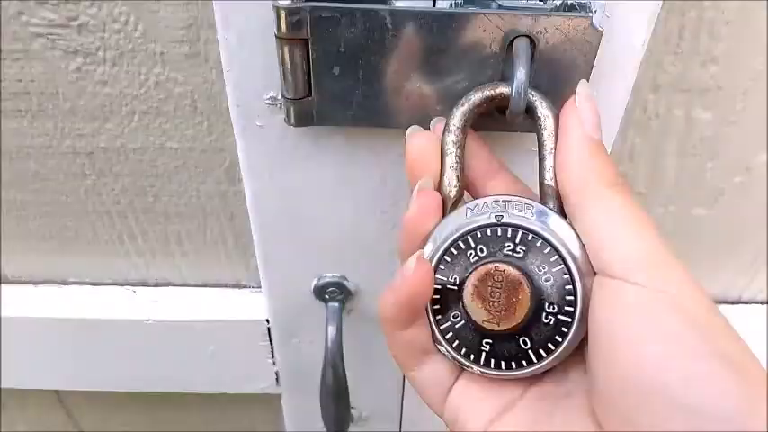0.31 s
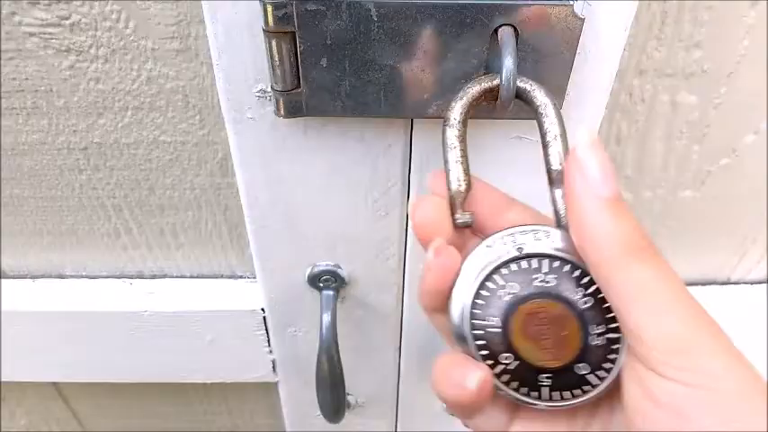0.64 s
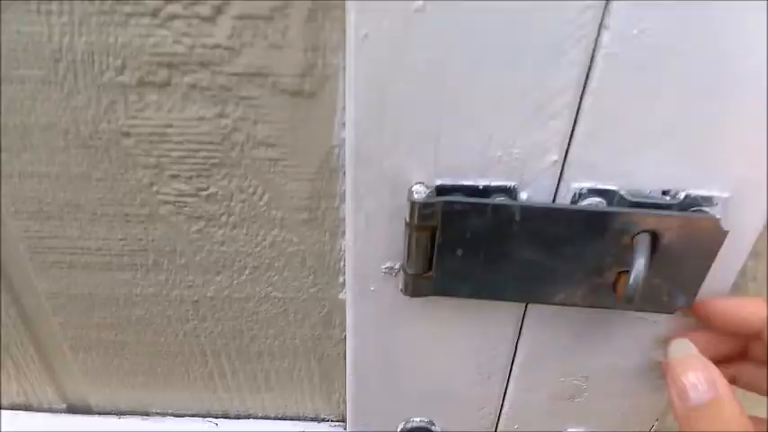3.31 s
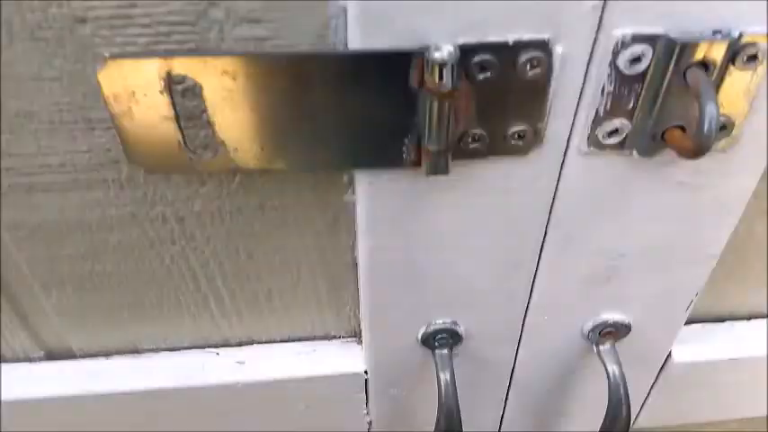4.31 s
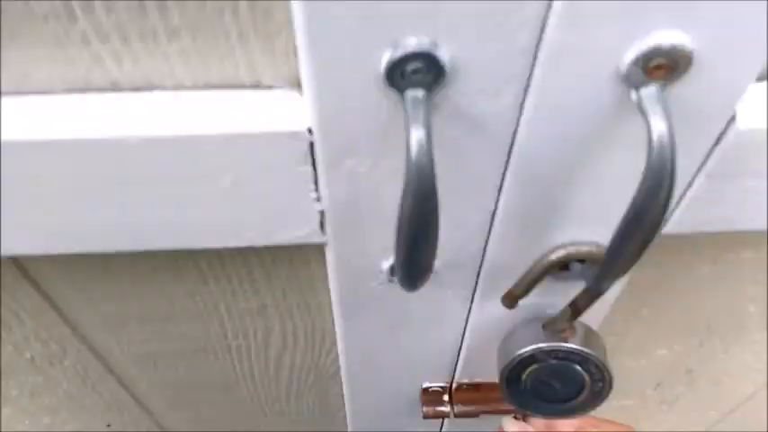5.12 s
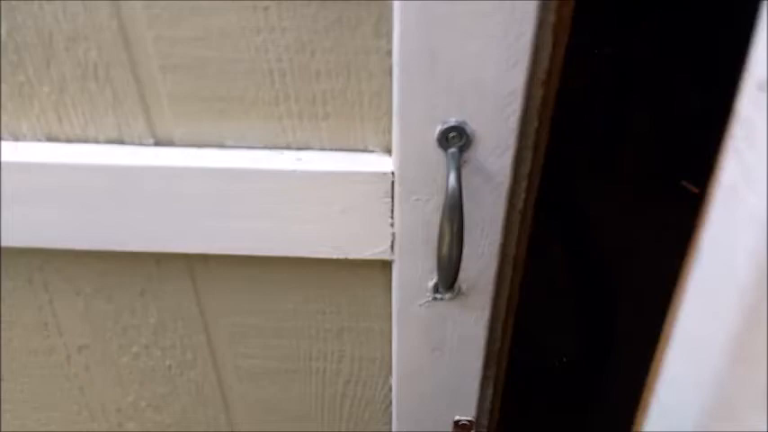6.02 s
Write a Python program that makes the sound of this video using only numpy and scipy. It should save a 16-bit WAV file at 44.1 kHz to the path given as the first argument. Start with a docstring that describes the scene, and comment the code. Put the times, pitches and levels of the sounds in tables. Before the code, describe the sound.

Close steel clicks, scrapes and short squeaks as a padlock is unhooked and its hasp opened, with a wooden door knocking and thudding.

```python
"""A combination padlock is twisted and drawn out of a steel hasp on a wooden shed door, heard close up.
Steel clicks and scrapes on steel, the boards knock along, and the lock rings thinly as it swings free.
The hasp is pulled open with a few stick-slip squeaks, and the door thuds as it is tugged.
A short gust buffets the microphone first; soft outdoor air and handling rumble lie under the rest."""
import sys
import numpy as np
from scipy import signal
from scipy.fft import rfft, irfft, next_fast_len
from scipy.io import wavfile
from scipy.ndimage import uniform_filter1d, map_coordinates

SR = 44100
rng = np.random.default_rng(int(sys.argv[2]) if len(sys.argv) > 2 else 0)


def store_pcm(level_fs):
    """Save levels as 16-bit WAV."""
    pcm = np.round(np.clip(level_fs, -1, 1) * 32767).astype(np.int16)
    wavfile.write(sys.argv[1], SR, np.atleast_2d(pcm).T)


N = 272538

# Steel striking steel. Each row: start in seconds, level in dB, brightness in dB, then door knock and
# shackle clank in dB over the level.
CLICKS = [(0.572, -54, -3, -2, 3), (0.6832, -31.5, 1.5, -7.5, 0), (0.7277, -31.5, -0.5, -6, -4.5),
          (0.7298, -37, 8.5, -7, -0.5), (1.126, -56.5, -3.5, 3, 5), (1.3423, -44.5, -1, -8, 5),
          (1.4014, -41.5, 2.5, -6, 3), (1.642, -51, 2, -3, 9), (1.7236, -33, 0.5, -5, 0),
          (1.729, -40, 3.5, -3, -1), (1.7557, -49.5, -6, -13, 3), (1.776, -50.5, -4.5, -7, -2),
          (1.804, -44, -3, 6, 3), (1.8107, -39.5, 0, -3.5, 3), (1.814, -37.5, -0.5, -6, 4.5),
          (1.887, -35, 1.5, -0.5, -5), (1.9018, -36.5, -3.5, -12, -3.5), (1.9234, -32, 3, -13, -3),
          (1.927, -39, 7.5, -22, 3), (1.936, -40, 6, -13, 5), (1.945, -35.5, 9, -10, -1),
          (1.968, -45, -3, -9, -1), (1.991, -43, 2, -10, -0.5), (2.026, -45, 4, -13, 1.5),
          (2.042, -39.5, 7, -12, 0), (2.06, -43, 7, -16, -1), (2.071, -35.5, 9.5, -35, 1.5),
          (2.078, -42.5, 2, -24, -5), (2.1034, -33.5, 7, -13.5, -5.5), (2.151, -44, 0, -3.5, -2),
          (2.157, -48, 2, -12, -6), (2.16, -41, 11, -6.5, -2), (2.1906, -59, -2, -14, -6),
          (2.218, -52, 9, -5, 1), (2.635, -57.5, -6, -3, 3), (2.793, -49.5, 4.5, -7, 6.5),
          (2.86, -59, -8.5, -10, 2), (2.9629, -54, 2, 5.5, 7), (3.0486, -30.5, 6.5, -4.5, -3),
          (3.123, -65, -6, 7, -3), (3.241, -61.5, -5, 3, -9), (3.26, -54, 0, 3, -6),
          (3.568, -36.5, 5, -12, -2.5), (3.667, -54.5, -6, 7, -2), (3.704, -55, -5.5, -1, -1),
          (3.719, -47.5, -2, -15, 6), (3.744, -50.5, -1.5, 0, -3), (3.753, -51.5, -2.5, -0.5, 0),
          (3.803, -44, -2, -11, 5), (3.823, -50.5, -4, -10, 5), (3.8547, -34.5, -2.5, -10, 0),
          (3.8585, -29.5, 2.5, -6.5, 6), (3.868, -37, 0.5, -7, 4), (3.8737, -41.5, 2, -8, 4.5),
          (4.1742, -50.5, -4, -8, -2.5), (4.1962, -48.5, -4, -6, 1.5), (4.2175, -51, 0, -6, -1),
          (4.555, -59.5, 5.5, -15, 5), (4.866, -59, -7.5, 10, -8), (4.967, -36.5, 3.5, 2.5, 0.5),
          (4.972, -40.5, 6.5, -12, 0), (4.987, -41.5, -0.5, 1, 1), (4.999, -40.5, 6, -5, -5),
          (5.013, -44, 0, -2, -1.5), (5.0595, -55.5, -2, -4, 4), (5.169, -42.5, -5.5, -3, 4),
          (5.2253, -31, 5, -11.5, 1.5), (5.3768, -57, 1.5, -9, 9), (5.3849, -44, 7.5, -13, 3.5),
          (5.399, -53, 3, -9, 2), (5.4563, -46.5, 8, -5.5, 5.5), (5.484, -60.5, 11, -14, 0),
          (5.5, -54, 3, 5, 3), (5.677, -49, -8, 2, 3), (5.9636, -32, 5.5, -7.5, 0),
          (6.121, -57, 0.5, -5, 7.5), (6.158, -46.5, 1.5, -17.5, 0.5)]
# What a blow sets ringing: door, hasp plate, shackle, tick. Each row: low and high edge in Hz, t60 in
# seconds, then snap, after-ring and the after-ring's stereo spread in dB.
PARTS = [(258, 760, 0.099, 1.5, 3.5, 6), (780, 2420, 0.069, 1, -2.5, -2.5),
         (2520, 6420, 0.038, 0, -2.5, 14), (6500, 14000, 0.035, 1, 2, 1)]
# Modes of lock, hasp and door together. Each row: pitch in Hz, level in dB, t60 in seconds.
BODY_MODES = [(505, 3.5, 0.052), (578, -3.5, 0.082), (725, -6.5, 0.026), (920, -5, 0.038),
              (1160, 1.5, 0.04), (1444, 1.5, 0.049), (1656, -2.5, 0.026), (2220, -6, 0.022),
              (2400, -2, 0.015), (2630, 0, 0.017), (2858, 11, 0.022), (3430, 9, 0.0029),
              (4284, 16.5, 0.013), (4680, 2.5, 0.014), (5800, -8.5, 0.02), (8060, -2, 0.0012),
              (9680, -5.5, 0.015), (10500, -9, 0.04), (13600, -18.5, .035)]
# Hard blows on the hasp. Each row: start in seconds, pitch in Hz, level in dB, t60 in seconds.
CLANGS = [(0.6828, 1210, -31, 0.029), (.7278, 586, -24.5, 0.026), (.7278, 2680, -25, .011),
          (.7278, 1150, -22.5, 0.01), (3.0473, 8700, -13, 0.0042), (3.0485, 490, -39, .04),
          (3.8586, 1890, -20.5, 0.013), (5.168, 1570, -27.5, 0.022), (5.2257, 1460, -22, 0.02),
          (5.2255, 5940, -15.5, 0.0065), (5.9637, 1630, -35, .025)]
# The lock bumping the door. Each row: start in seconds, boards in dB, hasp plate in dB.
KNOCKS = [(0.7278, -41, -33.5), (1.343, -59, -45), (1.4016, -50, -40.5), (1.643, -49, -52),
          (1.8134, -36, -39), (2.6355, -44, -41), (2.793, -43.5, -70), (2.8594, -42.5, -43),
          (3.874, -46.5, -50), (4.081, -50.5, -59), (4.97, -34, -33), (5.229, -46.5, -39),
          (5.397, -56, -47.5), (5.853, -41.5, -54), (6.055, -54, -49.5)]
# Gritty stretches. Those at 0.662 and 5.212 s are brief swells of gritty noise just before a hard click;
# the rest are steel scrapes. Each row: start and end in seconds, level in dB, brightness in dB, then door
# knock and shackle clank in dB over the level.
GRIT = [(0.662, 0.684, -51, -5, -8, -2), (0.69, 0.752, -52, 4, -12, -1), (1.72, 1.82, -60, -1.5, 14.5, -2),
        (1.885, 2.035, -52.5, -5, -1, -1), (2.056, 2.088, -48, 3, -12, 3), (2.14, 2.245, -54.5, 3, -4.5, 1),
        (3.19, 3.36, -82.5, -2, 23.5, -14), (3.563, 3.58, -46.5, 2.5, -18, -3.5),
        (3.715, 3.76, -57, -3, 2, 6), (3.8, 3.868, -44.5, 0.5, -6, 3.5),
        (4.964, 5.022, -39.5, -1, -5, -2.5), (5.02, 5.055, -55, 0, -1, -4), (5.125, 5.19, -52.5, 5.5, 2, 0),
        (5.212, 5.226, -45, -3, -3, -5), (5.264, 5.302, -59.5, 9, -22, 1.5), (5.38, 5.407, -52.5, 0, -8, 3),
        (5.45, 5.52, -61.5, -1.5, 1, -0.5), (5.598, 5.635, -54.5, -4.5, 5, -1.5),
        (5.666, 5.73, -52, -1, 4.5, 1.5), (6.07, 6.11, -61, -7, -3, 4)]
# The shackle grinding through the staple. Each row: start and end in seconds, first and last level in dB.
GRINDS = [(3.654, 3.695, -49, -52), (3.7, 3.774, -44.5, -47.5), (3.789, 3.851, -39.5, -39.5)]
# The resonances of that grind. Each row: pitch in Hz, width in Hz, level in dB.
GRIND_MODES = [(598, 41, -2), (1150, 45, -5.5), (1473, 70, 3), (2084, 35, -1.5), (2750, 100, 2)]
# The lock left ringing freely. Each row: start in seconds, level in dB.
CHIMES = [(.728, -61), (1.724, -58), (2.225, -58), (4.995, -54)]
# The lock's lightly damped high modes. Each row: pitch in Hz, level in dB, t60 in seconds.
CHIME_MODES = [(8952, 0, .48), (10680, 4, .12), (13200, 0, .07)]
# Dry squeaks. Each row: start and length in seconds, first and last pitch in Hz, level in dB,
# roughness from 0 to 1.
SQUEAKS = [(3.699, 0.041, 1397, 1304, -42, 0.77), (3.757, 0.028, 13400, 13200, -49, 0.4),
           (3.794, 0.022, 1500, 1580, -37, 0.5), (4.541, 0.054, 1560, 1478, -38.5, 0.35),
           (5.135, 0.014, 10160, 10500, -19, 0.3), (5.142, 0.021, 10460, 10200, -40, 0.2),
           (5.258, 0.049, 11100, 10950, -32, 0.62)]
# The door hitting its frame. Each row: start in seconds, level in dB, t60 in seconds, push pitch in Hz.
THUDS = [(4.964, -31, 0.12, 73.3), (4.979, -23.5, 0.065, 160), (5.012, -36.5, 0.13, 215)]
# The door's low hum. Each row: pitch in Hz, level in dB.
PANEL_MODES = [(113, -22), (145, -22), (226, -15.5), (318, -14)]

# The envelope of the buffeting. Each row: time in seconds, level in dB.
GUST_ENVELOPE = [(0, -21), (.025, -39), (.095, -39), (.125, -28), (.155, -32.5), (.185, -29.5),
                 (.212, -21.5), (.25, -34), (.287, -25), (.31, -34)]
# Tone curves of the gust and the background bed. Each row: frequency in Hz, relative density in dB.
BUFFET_EQ = [(20, -8), (40, -10), (70, 1), (120, -3), (170, -4), (260, -12), (420, -27.5), (900, -67)]
WASH_EQ = [(100, -3), (300, -2.5), (550, -6), (850, -0.5), (1200, -5.5), (1750, -2.5), (2500, -12),
           (4000, -23.5), (7000, -29.5), (15000, -36)]
RUMBLE_EQ = [(20, -22), (40, -10.5), (60, -11.5), (85, 3.5), (110, -7.5), (160, -20.5), (400, -68)]
LOW_AIR_EQ = [(60, -34.5), (110, -16.5), (145, 0), (178, 0), (212, -6), (262, 0.5), (330, -5), (410, -9.5),
              (520, -8.5), (750, -28.5), (1500, -75.5)]
MID_AIR_EQ = [(250, -64), (500, 0), (750, -1.5), (900, 0.5), (1150, -2), (1550, 2.5), (1900, -4),
              (2500, -8.5), (3400, -12), (5000, -23), (9000, -88.5)]
HISS_EQ = [(2000, -65), (3600, 1), (4500, 6), (5300, 5.5), (6400, 1), (6680, -5.5), (6950, 0.5), (9200, -1),
           (11400, -1.5), (16000, -7)]
# How alike the bed is left and right. Each row: frequency in Hz, coherence from 0 to 1.
BED_COHERENCE = [(60, 0.93), (250, 0.71), (700, 0.52), (900, 0.13), (1150, 0.5), (1500, 1), (2200, 0.62),
                 (2750, 0.14), (3600, 1), (4600, 0.095), (15000, 0.87)]
# The bed rising out of the hush. Each row: time in seconds, gain in dB.
BED_FADE_IN = [(.42, -19.5), (.5, -4.5), (.6, 1)]
# The bed ducks after the hardest clicks. Each row: start in seconds, low point in dB, recovery in dB
# per second.
BED_DIPS = [(.745, -66, 16), (1.949, -61, 9.5), (2.111, -73, 16), (3.055, -70, 18.5), (3.875, -68.5, 11),
            (5.03, -59, 11), (5.228, -70.5, 18), (5.968, -65.5, 14)]
# Phase between the two microphone ports. Each row: frequency in Hz, left minus right in radians.
PORT_PHASE = [(60, 1.84), (200, 0.98), (450, 0.87), (1000, 0.5), (2000, -0.5), (2400, -0.18), (2800, 2.5),
              (3600, 2), (4200, 3.5), (4900, -0.26), (6200, -0.04), (7250, -3), (8300, -1.5), (9000, -0.7),
              (10200, 1.11), (11400, 3), (12600, 5.5), (13600, 8), (15500, 6.5)]
# Each port favours its own frequencies. Each row: frequency in Hz, left minus right in dB.
PORT_BALANCE = [(1500, -0.5), (2600, -0.5), (3500, -0.5), (4400, 5.5), (5300, -1.5), (6300, 1.5),
                (8000, -0.5), (10500, -1), (13500, 2)]

TOP_HZ = 16300


def clicks(blow=3.5, chatter_s=0.00064, halving_db=3.5):
    """Steel hits steel: a sharp blow, then the faces chatter; duller clicks are longer and grittier."""
    rows, t, out = np.array(CLICKS), np.arange(SR // 40) / SR, np.zeros((2, N))
    bright_db = rows[:, 2:3]
    decay_s = chatter_s * .5 ** (bright_db / halving_db)
    chatter = rng.standard_normal((len(rows), len(t))) * np.exp(-t / decay_s)
    chatter[:, 0] = blow
    for part, response in enumerate(part_responses(len(rows), ring_db=3.5)):
        hits = unit_energy(signal.fftconvolve(chatter[:, None], response, axes=-1)) * np.sqrt(SR // 100)
        for (s, *stroke), hit in zip(rows, hits):
            add(out, s, amp(part_levels(*stroke)[part]) * hit)
    return out


def part_responses(count, ring_db):
    """Each part answers count blows in stereo: a direct snap, ringing modes and a diffuse after-ring."""
    t = np.arange(SR // 9) / SR
    hz, db, t60 = np.transpose(BODY_MODES)
    modes = unit_energy(np.sin(2 * np.pi * hz[:, None] * t) * amp(-60 * t / t60[:, None]))
    # every blow lands elsewhere and so wakes the modes in new proportions
    weights = amp(db + 3.5 * rng.standard_normal((count, len(hz))))
    ringing = (weights * rng.choice([-1, 1], weights.shape)) @ modes
    impulse = 1. * (t == 0)
    for low_hz, high_hz, after_t60, snap_db, after_db, spread_db in PARTS:
        centre = rng.standard_normal((count, 1, len(t)))
        sides = amp(spread_db) * rng.standard_normal((count, 2, len(t)))
        tail = (centre + sides) * amp(-60 * t / after_t60) * (1 - np.exp(-t / 0.00018))
        snap, ring, after = (unit_energy(band(x, low_hz, high_hz))
                             for x in (impulse, ringing[:, None], tail))
        yield amp(snap_db) * snap + amp(ring_db) * ring + amp(after_db) * after


def part_levels(level_db, bright_db, door_db, clank_db, tick_db=-7):
    """The mix of door, plate, shackle and tick in dB: brightness tilts it from the plate to the tick."""
    return level_db + np.array([door_db, -bright_db, clank_db, tick_db + bright_db])


def clangs(attack_s=.0002):
    """A hard blow makes one mode of the hasp stand out, its pitch set by where the blow lands."""
    out, t = np.zeros(N), seconds(.08)
    attack = 1 - np.exp(-t / attack_s)
    for s, hz, db, t60 in CLANGS:
        add(out, s, amp(db - 60 * t / t60) * np.sin(2 * np.pi * hz * t) * attack)
    return out


def knocks(boards_t60=0.098, plate_t60=.04, spread_db=-7, push=6.9):
    """A cushioned bump with no click: a hollow knock from the boards, a short dull one from the plate."""
    out, t = np.zeros((2, N)), seconds(0.13)
    boards_hz, plate_hz = (267, 676), (645, 1960)
    for s, boards_db, plate_db in KNOCKS:
        for db, t60, edges in ((boards_db, boards_t60, boards_hz), (plate_db, plate_t60, plate_hz)):
            noise = rng.standard_normal(len(t)) + amp(spread_db) * rng.standard_normal((2, len(t)))
            bump = noise * amp(-60 * t / t60) + push * (t == 0)
            add(out, s, amp(db) * np.sqrt(SR // 100) * unit_energy(band(bump, *edges)))
    return out


def grit(grains_per_s=500, noise_db=-13):
    """Tiny grains ring the same parts as a click: scrapes, and brief gritty swells before hard clicks."""
    out = np.zeros((2, N))
    responses = list(part_responses(len(GRIT), ring_db=-2.0))
    for k, (start, end, *stroke) in enumerate(GRIT):
        size = max(int((end - start) * SR), SR // 100)
        grains = unit((rng.random(size) < grains_per_s / SR) * rng.standard_normal(size))
        noise = amp(noise_db) * rng.standard_normal(size)
        drive = (grains + noise) * amp(2.6 * wobble(122, size)) * signal.windows.tukey(size, .3)
        for db, response in zip(part_levels(*stroke), responses):
            texture = unit_energy(signal.fftconvolve(drive[None], response[k], axes=-1))
            add(out, start, amp(db) * np.sqrt(size) * texture)
    return out


def grinds(slips_per_s=450, drift=0.023):
    """Uneven slips of the shackle ring a few resonances, which wander as the point of contact moves."""
    out, t = np.zeros(N), seconds(0.046)
    modes = [(db, np.cos(2 * np.pi * hz * t) * np.exp(-np.pi * width * t))
             for hz, width, db in GRIND_MODES]
    for start, end, first_db, last_db in GRINDS:
        size = int((end - start) * SR)
        slips = (rng.random(size) < slips_per_s / SR) * rng.uniform(-0.95, 1, size)
        rasp = sum(amp(db) * unit(signal.fftconvolve(slips, mode)[:size]) for db, mode in modes)
        speed = 1 + drift * wobble(35, size)
        wandering = np.interp(np.cumsum(speed), np.arange(size), rasp)
        envelope = amp(np.linspace(first_db, last_db, size)) * signal.windows.tukey(size, .25)
        add(out, start, unit(wandering) * envelope)
    return out


def chimes():
    """The high modes of the lock sing on after it is let go."""
    out, t = np.zeros(N), seconds(.5)
    ring = sum(amp(db - 60 * t / t60) * np.sin(2 * np.pi * hz * t) for hz, db, t60 in CHIME_MODES)
    for s, db in CHIMES:
        add(out, s, amp(db) * ring)
    return out


def squeaks(third_db=-18):
    """Stick-slip grabs one mode: the pitch slides and trembles, and low squeaks carry a third harmonic."""
    out = np.zeros(N)
    for s, length, start_hz, end_hz, db, rough in SQUEAKS:
        size = int(length * SR)
        hz = np.linspace(start_hz, end_hz, size) * (1 + .025 * rough * wobble(770, size))
        swell = np.hanning(size) * amp(db + 4.8 * rough * wobble(230, size))
        phase = 2 * np.pi * np.cumsum(hz) / SR
        third = np.sin(3 * phase) * (3 * start_hz < TOP_HZ)
        add(out, s, swell * (np.sin(phase) + amp(third_db) * third))
    return out


def thuds(panel_t60=0.35, wood_db=-2, attack_s=0.0053):
    """The door lurches in its frame with a low push and a woody boom, then its panel modes hum on."""
    out, t = np.zeros((2, N)), seconds(0.49)
    for s, db, t60, push_hz in THUDS:
        wood = unit(band(rng.standard_normal((2, len(t))), 60, 380, order=2))
        boom = (np.sin(2 * np.pi * push_hz * t) + amp(wood_db) * wood) * amp(-60 * t / t60)
        panel = sum(amp(mode_db - 60 * t / panel_t60) * np.sin(2 * np.pi * (hz * t + rng.random()))
                    for hz, mode_db in PANEL_MODES)
        add(out, s, amp(db) * (boom + panel) * (1 - np.exp(-t / attack_s)))
    return out


def gust(lag_s=0.0004, lumps_db=5.0, wash_db=-44.5):
    """Wind pushes the two microphone ports in opposite senses, over an outdoor wash from the right."""
    def from_right(hz):
        # the path difference shows only above the midrange
        return np.exp(1j * np.pi * lag_s * np.outer([-1, 1], np.maximum(hz - 1150, 0)))
    push = rng.standard_normal(N) * [[-.92], [1.08]] + 0.16 * rng.standard_normal((2, N))
    wind = filtered(push, lambda hz: amp(along(BUFFET_EQ, hz)))
    buffet = unit(wind * amp(lumps_db * wobble(42, N)))
    outdoors = rng.standard_normal(N) + 0.44 * rng.standard_normal((2, N))
    wash = unit(filtered(outdoors, lambda hz: amp(along(WASH_EQ, hz)) * from_right(hz)))
    return amp(automation(GUST_ENVELOPE)) * buffet + amp(wash_db) * wash


def bed(hiss_db=-11.5, hiss_floor_db=-89):
    """Handling rumble, outdoor air, a whine and hiss ride one fader; a trace of hiss never ducks."""
    fader = amp(bed_fader_db())
    body = (whine()
            + amp(-9.5) * air(RUMBLE_EQ, flutter_db=1.5)
            + amp(2.5) * air(LOW_AIR_EQ, flutter_db=2.0)
            + amp(-0.5) * air(MID_AIR_EQ, flutter_db=0.74))
    hiss = air(HISS_EQ, flutter_db=2.5)
    return fader * body + (fader * amp(hiss_db) + amp(hiss_floor_db)) * hiss


def bed_fader_db(resting_db=-49.0):
    """The bed drops at each dip and creeps back at a steady rate; the fade-in gain goes on top."""
    t, db = np.arange(N) / SR, np.full(N, resting_db)
    for s, low_db, recover_db_per_s in BED_DIPS:
        db = np.where(t < s, db, np.minimum(low_db + recover_db_per_s * (t - s), resting_db))
    return uniform_filter1d(db, SR // 50) + automation(BED_FADE_IN)


def air(eq, flutter_db):
    """Coloured mid and side noise with a fluttering level; its stereo width varies with frequency."""
    def colour(hz):
        width = np.arccos(np.clip(along(BED_COHERENCE, hz), 0, 1)) / 2
        return amp(along(eq, hz)) * [np.cos(width), np.sin(width)]
    mid, side = filtered(rng.standard_normal((2, N)), colour)
    return np.array([mid + side, mid - side]) / np.std(mid) * amp(flutter_db * wobble(14, N))


def whine(centre_hz=6650, width_hz=220, mix_db=-17.5, fade_db_per_s=1.5):
    """A faint, narrow band of noise that slowly dies away."""
    tone = filtered(rng.standard_normal(N), lambda hz: 1 / (1 + (2 * (hz - centre_hz) / width_hz) ** 2))
    return amp(mix_db - fade_db_per_s * np.arange(N) / SR) * unit(tone)


def at_ports(x):
    """Sound reaches the two microphone ports out of step and unequally loud, varying with frequency."""
    def response(hz):
        phase = np.outer([.5, -.5], along(PORT_PHASE, hz))
        balance_db = np.outer([.5, -.5], along(PORT_BALANCE, hz))
        return np.exp(1j * phase) * amp(balance_db)
    return filtered(x, response)


def amp(db):
    """Decibels to gain."""
    return 10 ** (np.asarray(db) / 20)


def unit(x):
    """x at rms 1."""
    return x / np.sqrt(np.mean(x ** 2) + 1e-20)


def unit_energy(x):
    """x with energy 1 in each channel."""
    return x / np.sqrt(np.sum(x ** 2, axis=-1, keepdims=True) + 1e-20)


def along(points, hz):
    """A curve through (Hz, value) points on a log frequency axis."""
    point_hz, values = np.transpose(points)
    return np.interp(np.log(hz + 1), np.log(point_hz + 1), values)


def automation(points):
    """Straight ramps through (seconds, value) points, one value a sample."""
    return np.interp(np.arange(N) / SR, *np.transpose(points))


def seconds(length):
    """Sample times over a length."""
    return np.arange(int(length * SR)) / SR


def wobble(rate, size):
    """A smooth random curve, rate knots a second."""
    knots = rng.standard_normal(int(size * rate / SR) + 4)
    return map_coordinates(knots, [np.arange(size) * rate / SR])


def filtered(x, response):
    """x through a complex frequency response."""
    size = next_fast_len(N + SR // 4)
    return irfft(rfft(x, size) * response(np.fft.rfftfreq(size, 1 / SR)), size)[..., :N]


def band(x, low_hz, high_hz, order=3):
    """Causal band-pass."""
    return signal.sosfilt(signal.butter(order, [low_hz, high_hz], "band", fs=SR, output="sos"), x)


def add(track, s, sound):
    """Mix a sound into a track at s seconds."""
    start = max(round(s * SR), 0)
    track[..., start:start + sound.shape[-1]] += sound[..., :max(N - start, 0)]


def scene(hush_from_s=0.3163, hush_to_s=0.4194, hush_db=-28, pan_db=0.7):
    """The gust ends and the scene changes: after a brief dip in level, lock, hasp and door play over the bed, a
    little to the right."""
    t = np.arange(N) / SR
    gust_gate = uniform_filter1d(1. * (t < hush_from_s), SR // 150)
    bed_gate = np.maximum(uniform_filter1d(1. * (t > hush_to_s), SR // 150), amp(hush_db))
    hardware = clicks() + clangs() + knocks() + grit() + grinds() + chimes() + squeaks() + thuds()
    mix = gust_gate * gust() + at_ports(hardware + bed_gate * bed())
    return mix * amp([[-pan_db], [pan_db]])


def record(dry):
    """A brick-wall low-pass takes off the very top."""
    return filtered(dry, lambda hz: hz < TOP_HZ)


dry = scene()
out = record(dry)
store_pcm(out)
```